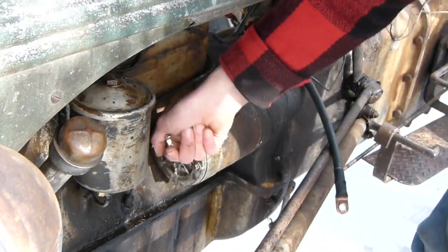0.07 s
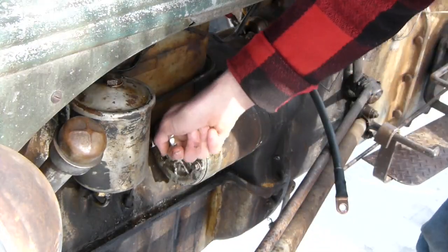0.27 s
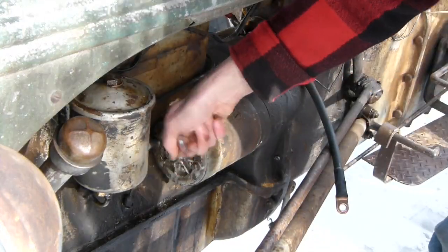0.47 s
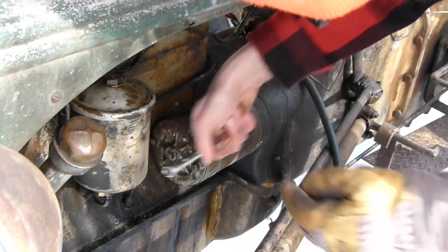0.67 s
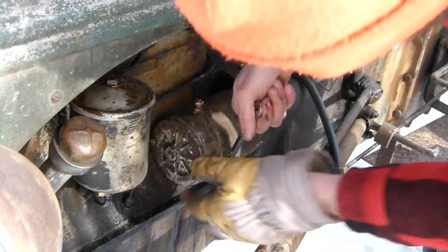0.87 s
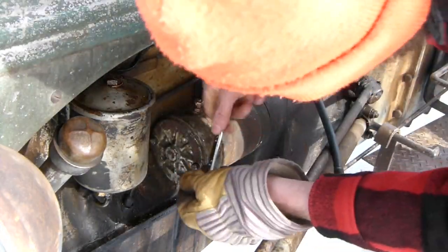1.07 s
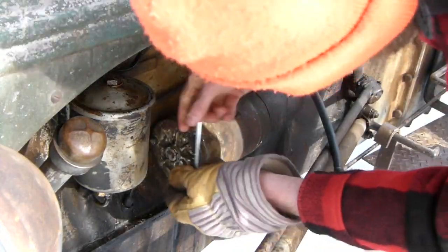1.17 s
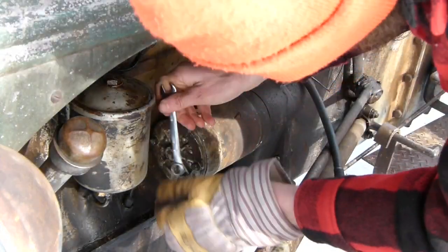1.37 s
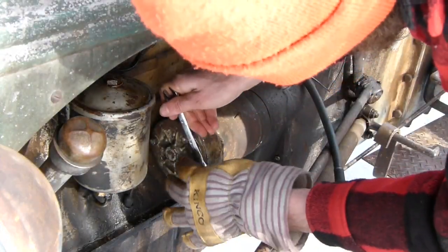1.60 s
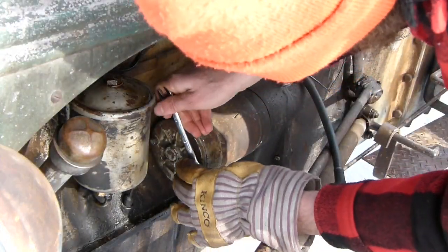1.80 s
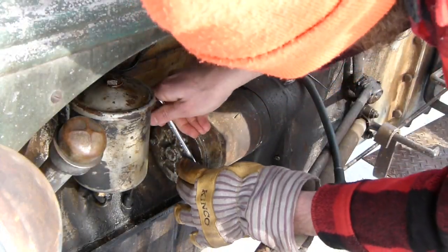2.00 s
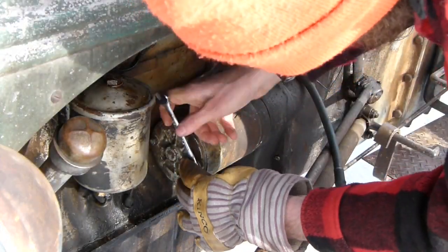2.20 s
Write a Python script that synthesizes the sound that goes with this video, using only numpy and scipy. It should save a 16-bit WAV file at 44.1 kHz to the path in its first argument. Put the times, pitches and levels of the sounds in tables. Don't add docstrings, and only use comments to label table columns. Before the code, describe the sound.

A metal wrench clicks and ticks against a bolt, with dull knocks and cloth rustle outdoors

```python
import sys
import numpy as np
from scipy import signal
from scipy.fft import rfft, irfft, next_fast_len
from scipy.io import wavfile
from scipy.ndimage import uniform_filter1d, map_coordinates

SR = 44100
rng = np.random.default_rng(int(sys.argv[2]) if len(sys.argv) > 2 else 0)


def to_wav(sig):
    pcm = np.clip(np.atleast_2d(sig), -1, 1) * 32767
    pcm = np.round(pcm).astype(np.int16)
    wavfile.write(sys.argv[1], SR, pcm.T)


def boost(x):
    u = np.asarray(x, float) / 20
    return 10 ** u


N = 99225


def unit(x):
    return x / np.sqrt(np.mean(x ** 2) + 1e-20)


def along(points, hz):
    point_hz, value = np.transpose(points)
    return np.interp(np.log(hz + 1), np.log(point_hz + 1), value)


def wobble(knots_per_s):
    knots = rng.standard_normal(int(N * knots_per_s / SR) + 4)
    return map_coordinates(knots, [np.arange(N) * knots_per_s / SR])


def filtered(x, response):
    n = x.shape[-1]
    size = next_fast_len(n + 8192)
    return irfft(rfft(x, size) * response(np.fft.rfftfreq(size, 1 / SR)), size)[..., :n]


def coloured(n, spectrum):
    return unit(filtered(rng.standard_normal(n), lambda hz: boost(along(spectrum, hz))))


def add(track, start_s, sound):
    start = round(start_s * SR)
    part = track[..., start:start + sound.shape[-1]]
    part += sound[..., :part.shape[-1]]


def ring(modes, t, rise_s, scatter_db, unsteady_db):
    grip_per_s = 350
    phase_scatter_rad = 0.6
    skew_rad = 0.33
    hz, db, t60 = np.transpose(modes)[..., None]
    chance = rng.standard_normal((3, len(modes), 1))
    knots = rng.standard_normal((2, len(modes), 200))
    shake, drift = [np.array([np.interp(t * grip_per_s, np.arange(200), row) for row in k]) for k in knots]
    level_db = db + scatter_db * chance[0] + unsteady_db * shake - 60 * t / t60
    size = boost(level_db) * (1 - np.exp(-t / rise_s))
    phase = 2 * np.pi * hz * t + phase_scatter_rad * chance[1] + 0.17 * unsteady_db * drift
    skew = skew_rad * np.sign(chance[2])
    left = (size * np.sin(phase + skew)).sum(0)
    right = (size * np.sin(phase - skew)).sum(0)
    return np.array([left, right])


# start_s, peak_db, treble_tilt_db_per_octave
DROP = [
    (.5597, -18, 1.5),
    (.5631, -14, -9),
    (.5666, -13, -11),
    (.5725, -24, -3),
]
SEAT = [
    (0.6011, -29, -4.5),
    (0.601, -15, 1),
    (.6045, -18, -2.5),
    (0.6092, -31, -4),
]
SLAP = [
    (1.6213, -18.5, 0),
    (1.6255, -25, -9),
    (1.633, -26.5, -9),
]
TICK = [
    (1.8424, -23.5, 0),
    (1.8441, -30, 0),
    (1.8458, -32, 0),
    (1.8495, -48, 0),
]
BITE = [
    (2.0012, -27, 0.23),
    (2.002, -15.5, 0.21),
    (2.0034, -17.5, -2),
    (2.0065, -23, -1.1),
]
TOUCH = [
    (.5305, -39, -10),
    (1.4735, -37, -6),
    (1.484, -48, 2),
    (1.735, -41, -7),
    (1.9048, -50, -6),
    (1.922, -51, -2),
    (1.9373, -38, -1.5),
    (1.9445, -33, -9),
    (1.9557, -36.5, -5),
    (1.962, -44, -1),
]
# pitch_hz, level_db, t60_s
LOOSE = [(1200, -15, 0.023), (1586, -16, 0.065), (2066, 1, 0.057), (2400, 5.5, 0.065), (2800, -11, 0.023),
         (3020, -5, 0.016), (3630, 1.5, 0.016), (3860, -2.5, 0.024), (5160, -4, 0.035), (6100, -5, 0.02),
         (6900, -6, .015), (9200, -12, 0.033), (10800, -11.5, 0.053), (14000, -14, 0.023)]
SEATED = [(1070, -17, 0.024), (1987, -16.5, 0.21), (2380, -2.5, 0.061), (2458, -3.5, 0.065),
          (3767, -9.5, 0.055), (5090, 1.5, 0.016), (6190, -10, 0.029), (7000, 0, .012), (8100, -5, .018),
          (8600, 5.5, 0.011), (9280, 0.5, 0.025), (9350, 1.5, .018), (11650, -4, 0.02),
          (13800, -3.5, 0.015)]
SLAPPED = [(790, -9, 0.1), (1313, -19, .04), (2144, -5.5, 0.037), (2340, 0.5, 0.043), (3280, 3, 0.04),
           (3485, 4, 0.035), (3980, -3, 0.028), (4780, 1.5, 0.023), (5400, -12, .03), (6270, 3.5, 0.016),
           (7540, 1.5, 0.025), (9090, 4, 0.02), (10700, -28, 0.029), (14040, -1, 0.016)]
PINCHED = [(1340, -2.5, 0.021), (3460, -5, 0.022), (5730, -10, 0.023), (6370, 7, 0.018), (7800, -4, .016),
           (9100, 5, 0.015), (9700, -11, 0.014), (10750, -3.5, 0.017), (11400, 0, .014), (12600, -4, 0.018),
           (13300, -4, 0.015), (14000, -9, .013)]
LOADED = [(837, -17.5, 0.14), (1300, -0.5, 0.012), (1590, -15, 0.015), (1987, -0.5, 0.021),
          (2460, -3.5, 0.023), (3330, -6, 0.041), (4990, -1.5, 0.014), (5230, 5, 0.02), (6450, -8, 0.012),
          (8400, 2.5, 0.013), (8970, 7.5, 0.019), (9640, 6, 0.0076), (12300, -5, 0.016), (14600, -1, 0.012)]
SLIDING = [(1010, -0.5, 0.027), (1520, 4, 0.017), (1980, -4.5, 0.042), (2280, 0.5, 0.024),
           (2820, -15, 0.034), (4020, -3, .02), (5170, -3, 0.034), (6300, -1, .025), (9300, -1, .025)]
CRACK_DB = [-3.5, 0, -1.5, -5.5, -3, 0]
CRACK_T60_S = [0.014, 0.014, 0.05, 0.022, 0.017, 0.026]
GRIP_DB = [2, 3.5, 3, 2, 3, 3]
# pitch_hz, level_db
CRACK = [(400, 3), (1500, 3), (2500, 2.5), (10000, -3), (14500, -12), (16500, -50)]


def tilted(modes, tilt_db):
    return [(hz, db + tilt_db * max(0, np.log2(hz / 2000)), t60) for hz, db, t60 in modes]


def wrench():
    snap_db, snap_t60_s = 0, 0.005
    spread_db = -12.5
    out, t = np.zeros((2, N)), np.arange(SR // 8) / SR
    clicks = [DROP, SEAT, SLAP, TICK, BITE, TOUCH]
    holds = [LOOSE, SEATED, SLAPPED, PINCHED, LOADED, SLIDING]
    for contacts, modes, crack_db, t60, grip_db in zip(clicks, holds, CRACK_DB, CRACK_T60_S, GRIP_DB):
        for start_s, db, tilt_db in contacts:
            centre = coloured(len(t), CRACK)
            sides = boost(spread_db) * coloured(len(t), CRACK) * [[1], [-1]]
            fall = boost(-60 * t / t60) + boost(snap_db - 60 * t / snap_t60_s)
            fall = fall * (1 - np.exp(-t / 0.00037))
            crack = boost(crack_db + tilt_db) * fall * (centre + sides)
            hit = ring(tilted(modes, tilt_db), t, 0.0001, 0.33, grip_db) + crack
            add(out, start_s, boost(db - 8.5) * hit)
    return out


# start_s, length_s, level_db, centre_hz, width_hz
SCRAPES = [
    (0.529, 0.019, -44, 1540, 2180),
    (1.47, 0.059, -45, 1880, 1650),
    (1.476, 0.051, -44, 470, 464),
    (1.527, 0.025, -55, 7000, 14000),
    (1.727, 0.024, -51, 2520, 2250),
    (1.895, 0.089, -54, 1790, 1290),
    (1.917, 0.045, -56.5, 4900, 2000),
    (1.931, 0.02, -55, 4770, 4000),
    (1.954, 0.03, -48, 1470, 2380),
    (1.989, 0.019, -47, 2570, 2500),
]


def jaws():
    grit_per_s, grit_db = 1600, 2
    ring_db, ring_width_hz, top_hz = -4.5, 104, 15300

    def peak(f, hz, width_hz):
        return 1j * f * width_hz / (hz * hz - f * f + 1j * f * width_hz)

    def steel(f):
        return 1 + sum(boost(ring_db + db) * peak(f, hz, ring_width_hz) for hz, db, t60 in SLIDING)

    out = np.zeros((2, N))
    for start_s, length_s, db, hz, width_hz in SCRAPES:
        t = np.arange(round(length_s * SR)) / SR
        shape = (2, 4410)
        grains = boost(grit_db * rng.standard_exponential(shape)) * (rng.random(shape) < grit_per_s / SR)
        grit = unit(grains * rng.standard_normal(shape)) + 1.28 * rng.standard_normal(shape)
        grit[:, :len(t)] *= np.sin(np.pi * (t / length_s) ** 0.6) ** 0.92
        grit[:, len(t):] = 0
        mid, side = filtered(grit, lambda f: peak(f, hz, width_hz) ** 3 * steel(f) * (f < top_hz))
        pair = mid + boost(-15.0) * side * [[1], [-1]]
        add(out, start_s, boost(db) * pair / mid[:len(t)].std())
    return out


# start_s, level_db
PUSHES = [
    (0.348, -45.5),
    (0.531, -38.5),
    (0.601, -42.5),
    (1.638, -36),
    (1.72, -41.5),
    (1.848, -60),
    (2.002, -35),
    (2.101, -45),
]
# pitch_hz, level_db, t60_s
PANEL = [(232.9, -4, 0.32), (276.6, -2.5, 0.36), (323, -3.5, 0.41), (344.1, -6, 0.45), (400, -7.5, 0.3),
         (508, -12.5, 0.23)]


def panel():
    out, t = np.zeros(N), np.arange(SR // 2) / SR
    for start_s, db in PUSHES:
        hum = ring(PANEL, t, rise_s=0.0079, scatter_db=1, unsteady_db=1.5).mean(0)
        add(out, start_s, boost(db) * hum)
    return out * boost(1.5 * wobble(30))


# start_s, peak_db, pitch_hz, t60_s
KNOCKS = [(0.216, -32, 250, 0.012), (.23, -27.5, 336, 0.0095), (0.2445, -30.5, 458, 0.072),
          (0.2503, -37, 400, 0.014), (0.26, -34, 327, 0.02), (0.2762, -25.5, 345, 0.023),
          (0.2842, -34, 350, 0.029), (0.2942, -24, 380, 0.016), (0.3077, -24.5, 390, 0.029),
          (0.328, -31, 400, 0.007), (0.4138, -19.5, 346, 0.016), (1.027, -19.5, 317, 0.012),
          (1.0355, -24, 372, 0.0081), (1.0823, -25, 337, 0.015), (1.0833, -18, 294, 0.019),
          (1.092, -30.5, 265, 0.047), (1.118, -39.5, 347, 0.016), (1.1594, -23, 432, 0.025),
          (1.168, -35.5, 480, 0.025), (0.363, -39, 505, 0.015), (.005, -51.5, 256, 0.18),
          (0.2249, -39.5, 195, 0.035), (.336, -36, 328, .02)]
# pitch_hz, level_db
MOUNT = [(40, -25), (120, -5), (300, 0), (900, -5), (1400, -20), (3000, -45), (9000, -120)]
# start_s, level_db
EDGES = [
    (0.2231, -49),
    (.2445, -44),
    (0.276, -50),
    (.2942, -55),
    (0.3068, -48),
    (0.4141, -44),
    (1.024, -40.5),
    (1.0819, -37),
    (1.084, -31),
    (1.159, -38),
]
# pitch_hz, level_db
EDGE = [(90, -40), (300, -8), (900, 4.5), (2800, -2), (7000, -14.5), (16000, -70)]


def mount():
    rise_cycles, overtone, overtone_db = 0.34, 2.11, -17.5
    rumble_db, rumble_t60_s = -15, 0.1
    out, t = np.zeros(N), np.arange(SR // 5) / SR
    for start_s, db, hz, t60 in KNOCKS:
        swing = -np.sin(2 * np.pi * hz * t) + boost(overtone_db) * np.sin(2 * np.pi * overtone * hz * t)
        shape = (1 - np.exp(-t * hz / rise_cycles)) ** 2 * boost(-60 * t / t60)
        rumble = boost(rumble_db - 60 * t / rumble_t60_s) * coloured(len(t), MOUNT)
        rumble = rumble * (1 - np.exp(-t / 0.00061))
        add(out, start_s, boost(db) * (swing * shape / shape.max() + rumble))
    for start_s, db in EDGES:
        add(out, start_s, boost(db - 60 * t / 0.024) * coloured(len(t), EDGE))
    return out


# pitch_hz, likeness_0_to_1
ALIKE = [(30, 0.34), (90, 0.98), (400, 0.98), (900, 0.53), (2500, 0.31), (15000, 0)]


def rush(spectrum, patchy_db):
    noise = signal.stft(rng.standard_normal((2, N)), nperseg=512)[2]
    field = uniform_filter1d(rng.standard_normal(noise.shape[1:]), 6, 0)
    field = uniform_filter1d(field, 8, 1)
    pair = signal.istft(noise * boost(patchy_db * unit(field)), nperseg=512)[1][:, :N]

    def mid_side(hz):
        turn = np.arccos(np.clip(along(ALIKE, hz), -1, 1)) / 2
        return boost(along(spectrum, hz)) * [np.cos(turn), np.sin(turn)]

    mid, side = filtered(pair, mid_side)
    return unit(np.array([mid + side, mid - side]))


# time_s, rustle_db, rub_db
SLEEVE = [(0, -54.5, -66), (.16, -60.5, -63), (0.177, -49, -48), (.25, -49.5, -41.5), (.28, -54, -56),
          (.7, -52, -58), (0.82, -50, -56), (.96, -43.5, -49.5), (1.04, -49, -55), (1.15, -52.5, -51.5),
          (1.45, -55, -79), (1.56, -60, -63.5), (1.85, -99, -54.5), (2.25, -92, -56.5)]
# pitch_hz, level_db_per_hz
CLOTH = [(300, -40), (800, -6), (1700, 0.5), (3500, -4.5), (11000, -9.5), (14500, -11.5), (15900, -120)]
# pitch_hz, level_db_per_hz
RUB = [(60, -28), (200, -2.5), (400, -1), (900, -8.5), (2500, -30), (9000, -120)]


def sleeves():
    time_s, *levels = np.transpose(SLEEVE)
    t = np.arange(N) / SR
    rustle_db, rub_db = [np.interp(t, time_s, db) + 1.56 * wobble(40.0) for db in levels]
    return boost(rustle_db) * rush(CLOTH, patchy_db=2.0) + boost(rub_db) * rush(RUB, patchy_db=1)


# pitch_hz, t60_s
YARD = [(300, 0.2), (2500, 0.28), (10000, 0.035)]


def yard(x):
    dull_hz = 2200
    hz, t, noise = signal.stft(rng.standard_normal((2, SR // 3)), SR, nperseg=256)
    hz = hz[:, None]
    fading = noise * boost(-60 * t / along(YARD, hz)) / (1 + (hz / dull_hz) ** 2)
    tail = signal.istft(fading, SR, nperseg=256)[1]
    delayed = np.pad(x, (200, 0))[None]
    return signal.fftconvolve(delayed, tail / np.linalg.norm(tail[0]), axes=1)[:, :N]


# pitch_hz, level_db_per_hz
AIR = [(20, 1), (100, -2), (300, 2), (500, -2), (1880, -7), (10400, -11.5), (14200, -15.5), (15000, -48),
       (15500, -120)]


def air():
    return boost(-54.5 + 0.39 * wobble(3.6)) * rush(AIR, patchy_db=0.5)


# pitch_hz, left_over_right_db
LEAN = [(1200, 0), (2400, -1.5), (4400, 2.5), (8000, 1), (15000, 2.5)]


def scene():
    steel_low_hz = 500

    def place(hz):
        balance = boost(along(LEAN, hz) * np.array([[0.5], [-0.5]]))
        return balance * (1j * hz / (steel_low_hz + 1j * hz)) ** 2

    steel = filtered(wrench() + jaws(), place)
    tail = boost(-18) * yard(steel.mean(0))
    return steel + tail + panel() + mount() + sleeves() + air()


def band_limit(x):
    return signal.sosfilt(signal.butter(12, 16650, fs=SR, output="sos"), x)


def record(dry):
    low_cut_hz, top_hz = 55, 16500
    mix = filtered(dry, lambda hz: (1j * hz / (low_cut_hz + 1j * hz)) ** 2 * (hz < top_hz))
    return band_limit(mix)


dry = scene()
out = record(dry)
to_wav(out)
```